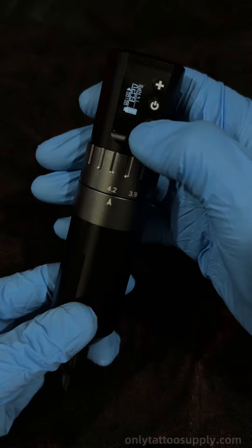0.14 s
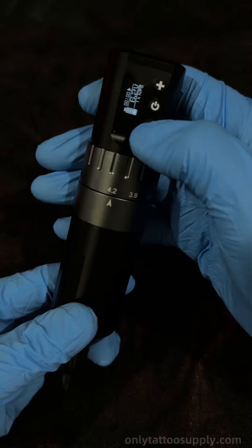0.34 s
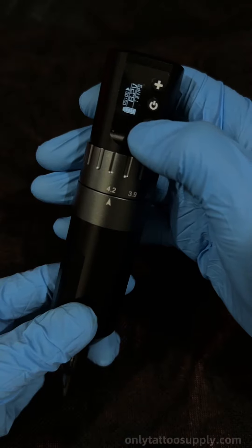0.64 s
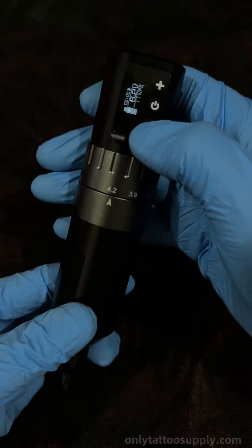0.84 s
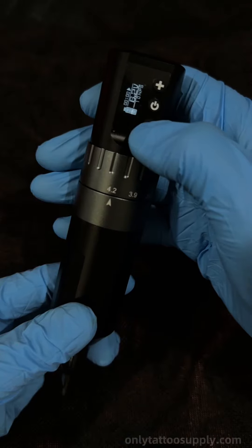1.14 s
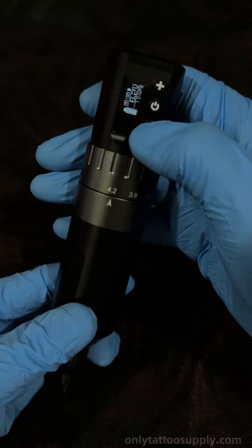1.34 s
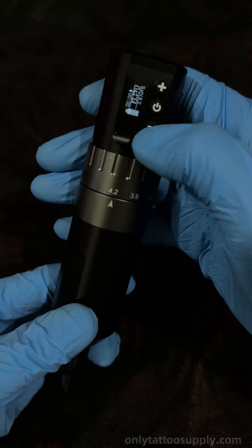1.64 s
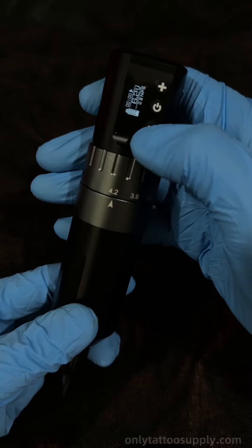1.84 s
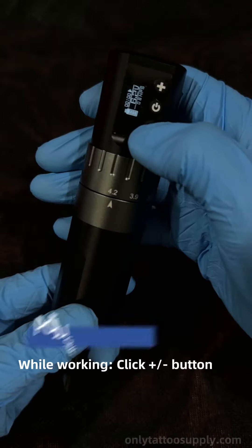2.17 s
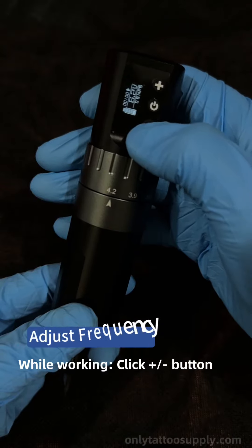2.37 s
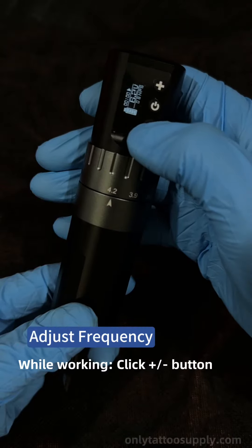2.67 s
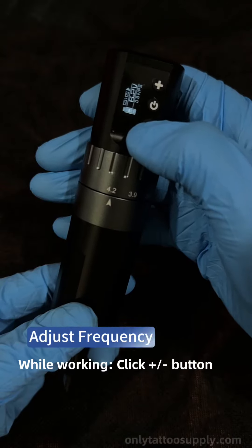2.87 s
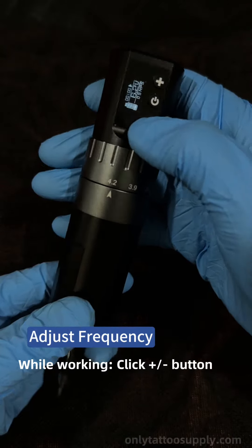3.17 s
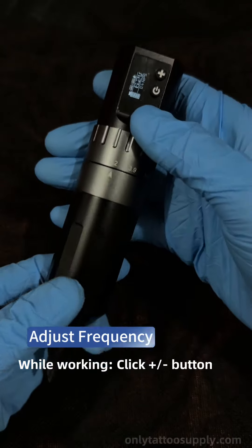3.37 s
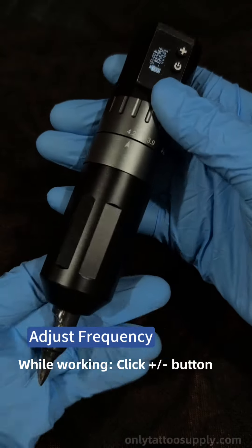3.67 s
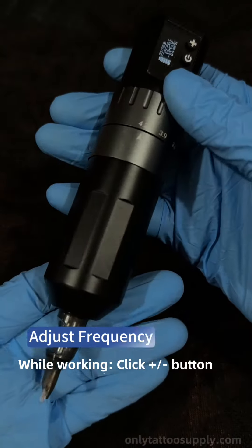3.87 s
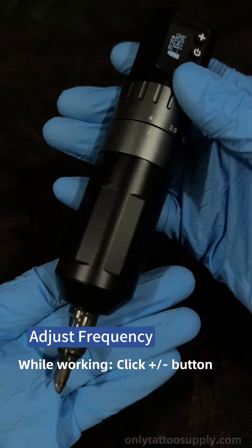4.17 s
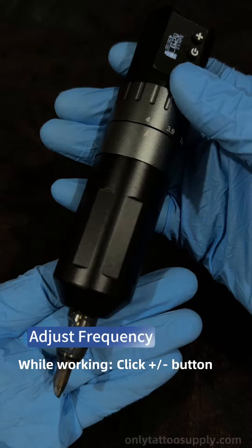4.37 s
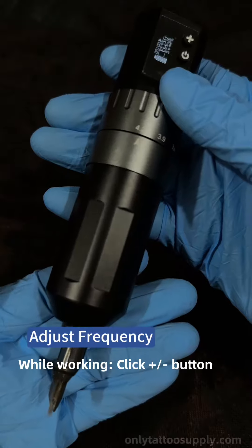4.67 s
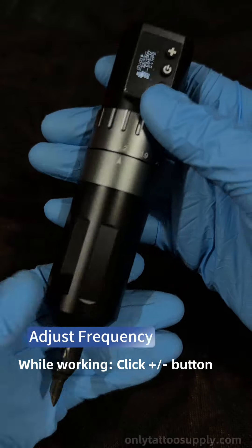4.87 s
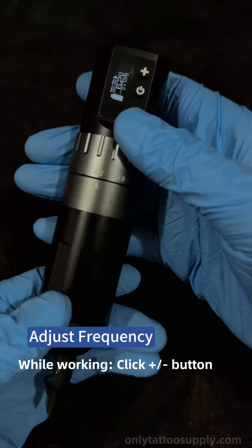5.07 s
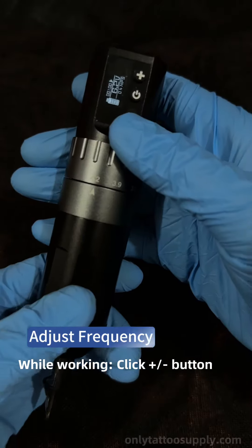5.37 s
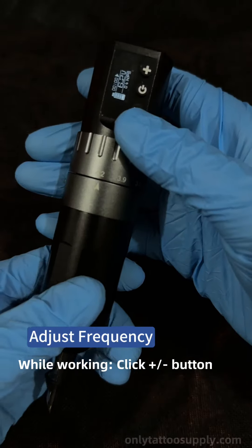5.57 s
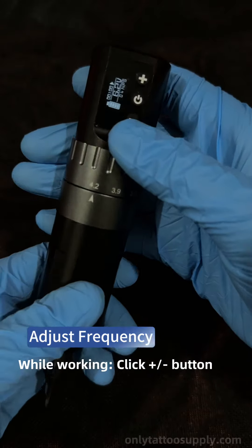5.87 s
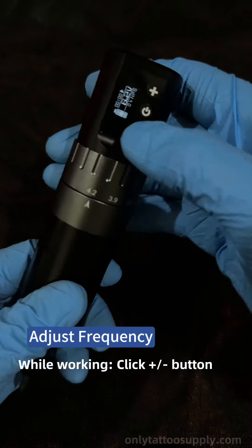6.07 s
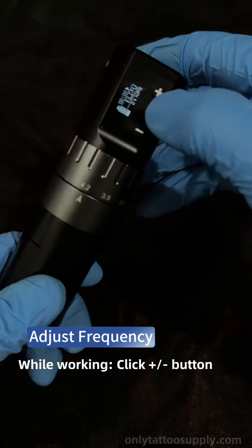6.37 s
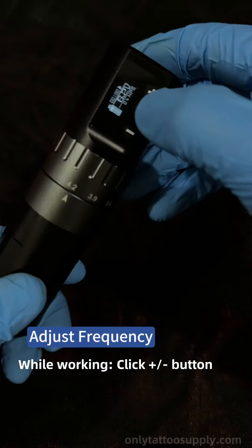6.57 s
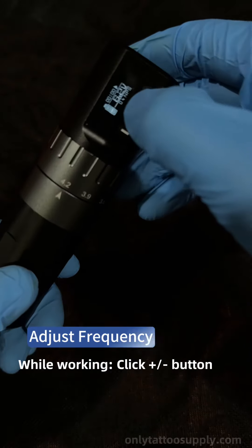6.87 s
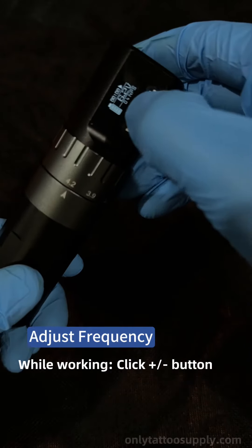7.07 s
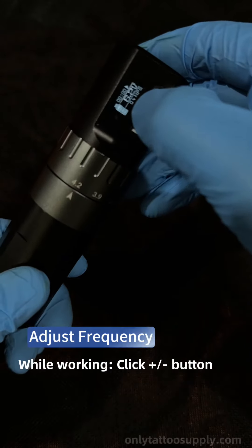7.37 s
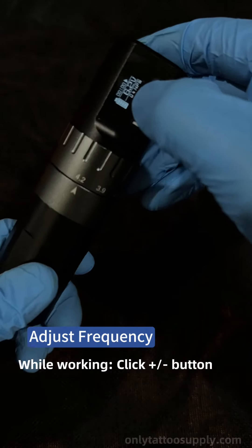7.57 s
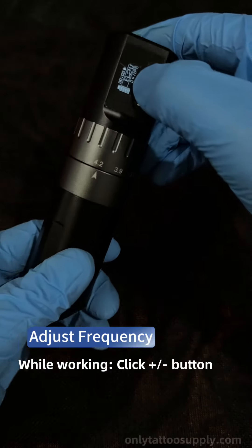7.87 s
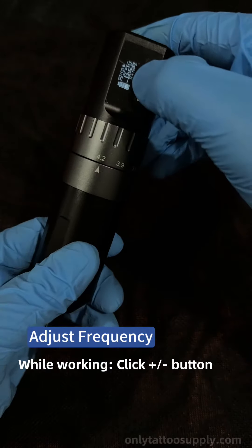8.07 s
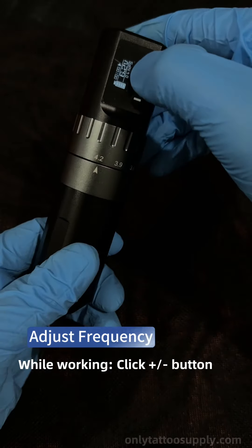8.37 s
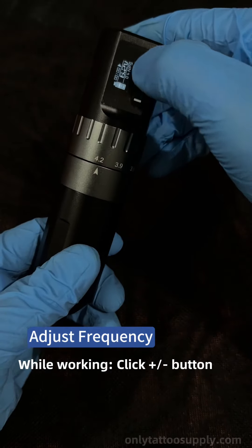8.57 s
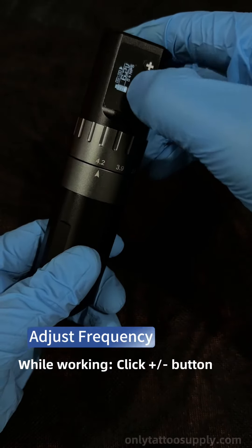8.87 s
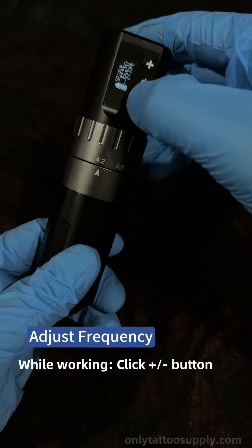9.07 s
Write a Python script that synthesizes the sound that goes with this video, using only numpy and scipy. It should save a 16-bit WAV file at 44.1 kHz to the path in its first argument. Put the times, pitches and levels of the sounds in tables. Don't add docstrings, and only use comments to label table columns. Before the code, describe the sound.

Steady on-off pulses of a tiny motor, bright and rattling, each starting abruptly and ending in a few slowing knocks with a faint ring. Snappy button clicks come first, then stop at about three seconds. After that thin rubber gloves rub, tick and bump as the tool is turned in the hand, while the pulses carry on regularly. Close phone microphone, small quiet room, faint distant drone and low hum beneath.

```python
import sys
import numpy as np
from scipy import signal
from scipy.fft import rfft, irfft, next_fast_len
from scipy.io import wavfile
from scipy.ndimage import map_coordinates

SR = 44100
rng = np.random.default_rng(int(sys.argv[2]) if len(sys.argv) > 2 else 0)


def transcribe(u):
    v = np.clip(np.atleast_2d(u).T, -1, 1)
    q = np.round(v * 32767).astype(np.int16)
    wavfile.write(sys.argv[1], SR, q)


def volts(x):
    e = np.asarray(x, float) / 20
    return 10 ** e


N = 407033


def unit(x):
    return x / np.sqrt(np.mean(x ** 2) + 1e-20)


def along(points, hz):
    f, v = np.transpose(points)
    return np.interp(np.log(hz + 1), np.log(f + 1), v)


def share_along(points, hz):
    return np.clip(along(points, hz), 0, 1)


def curve(rows):
    return np.interp(np.arange(N) / SR, *np.transpose(rows))


def wobble(rate):
    return map_coordinates(rng.standard_normal(int(N * rate / SR) + 4), [np.arange(N) * rate / SR])


def noise():
    return rng.standard_normal(N)


def filtered(x, response):
    m = next_fast_len(N + SR // 2)
    return irfft(rfft(x, m) * response(np.fft.rfftfreq(m, 1 / SR)), m)[..., :N]


def modes(table):
    def response(f):
        return sum((-1) ** k * volts(db) * 1j * f * w / (c * c - f * f + 1j * f * w)
                   for k, (c, w, db) in enumerate(table))
    return response


SHAFT_HZ = 78.68
# power on [t/s], level at start [level/dB], level at end [level/dB]
BURSTS = [(-.1385, -38.5, -42.5), (.479, -41, -43), (1.095, -41, -41.5), (1.723, -41.5, -43),
          (2.363, -41.5, -42), (3.04, -42.5, -39), (3.729, -39, -39.5), (4.417, -39, -38.5),
          (5.107, -40.5, -41), (5.793, -42, -42.5), (6.482, -39, -38.5), (7.172, -39, -39),
          (7.859, -41.5, -42), (8.548, -41.5, -43)]
RUNS = [.27, .248, .237, .263, .257, .267, .265, .265, .265, .265, .265, .265, .266, .265]
# small shift of its whole course, later or (below zero) earlier [t/ms]
SHIFT_MS = [-.4, .4, .4, .8, 1.1, 1, .2, .8, -.4, 2.2, 1.9, .4, 2.3, 1.5]
# time after power on [t/s], share of full speed [0-1], level [level/dB]
SPIN = [
    (0, .62, -25),
    (.0155, .85, -17),
    (.0166, .88, -4),
    (.032, 1, 0),
]
# time from last firm knock [t/s], share of full speed [0-1], level [level/dB]
COAST = [(-.04, 1, 0), (-.028, .82, -1), (-.02, .7, -2), (0, .62, -5), (.004, .5, -19), (.03, .33, -21),
         (.06, .2, -33), (.08, .1, -60)]


def shaft():
    turns, speed, level = np.zeros(N), np.zeros(N), np.full(N, -200.)
    main_knock_s = .0485
    t = np.arange(round(.4 * SR)) / SR
    for (on, start_db, end_db), run, lag in zip(BURSTS, RUNS, SHIFT_MS):
        at, share, db = np.transpose(SPIN + [(run + s, *rest) for s, *rest in COAST])
        pace = np.interp(t, at, np.clip(share, 0, 1))
        angle = np.cumsum(pace) * SHAFT_HZ / SR
        burst_db = np.interp(t, at, db, right=-200) + np.interp(t, [0, run], [start_db, end_db])
        now = np.arange(len(t)) + round((on + lag / 1000) * SR)
        heard = now >= 0
        turns[now[heard]] = (angle - np.interp(main_knock_s, t, angle))[heard]
        speed[now[heard]] = pace[heard]
        level[now[heard]] = burst_db[heard]
    return turns, speed, volts(level)


def level_to_buzz(x, buzz):
    return x / np.sqrt(np.mean((x * buzz) ** 2) / np.mean(buzz ** 2))


# [f/Hz], share alike [0-1]
REPEAT = [(3000, .05), (3600, .15), (4800, .25), (6000, .1), (9000, .04)]


def scrape(turns, running):
    track = rng.standard_normal(round(SR / SHAFT_HZ))
    same = map_coordinates(track, [turns % 1 * len(track)], mode="grid-wrap") * running
    repeated = filtered(same, lambda hz: np.sqrt(share_along(REPEAT, hz)))
    return repeated + filtered(noise(), lambda hz: np.sqrt(1 - share_along(REPEAT, hz)))


# place [share of a turn], level [level/dB], fade [turns]
KNOCKS = [
    (0, 0, .26),
    (.13, -2.5, .18),
    (.26, -2, .18),
    (.54, -1, .17),
]


def knocks(turns, speed, scatter_db, late):
    power = .025 * speed ** 2 + .04 * (turns < -2.5)
    burst = np.searchsorted([row[0] for row in BURSTS], np.arange(N) / SR) - 1
    for share, db, fade in KNOCKS:
        luck = rng.uniform(-1.7, 1.7, (64 * len(BURSTS), 2))
        row = 64 * burst + np.floor(turns - share + 0.09).astype(int) % 64
        since = (turns - share + 0.11) % 1 - .1 - late * luck[row, 0]
        bounce_db = -25 * (1 - speed) * (0 < share < .5)
        peak_db = db + bounce_db + scatter_db * luck[row, 1]
        power = power + (since > 0) * volts(2 * peak_db - 20 * np.abs(since) / fade)
    return np.sqrt(power)


# [t/s], [level/dB]
ACCENTS = [(3.7645, -0.5), (3.779, 3), (3.79, 1), (3.816, 4.5), (3.854, -2), (3.895, -1), (3.931, 3),
           (4.441, 0.5), (5.18, 2), (5.231, 2), (6.506, 0.5), (8.573, -4.5)]


def accents():
    db, t = np.zeros(N), np.arange(round(SR / SHAFT_HZ)) / SR
    for s, lift_db in ACCENTS:
        db[round(s * SR):][:len(t)] = lift_db * np.exp(-t / .012)
    return volts(db)


# from last firm knock [t/s], against the buzz [level/dB], rise [t/s]
ROLLS = [
    [(-.031, 1.5, 0.0025), (-.0185, 0, .0026), (-.0085, -1, 0.0028), (.009, -11, 0.0012),
     (.022, -12, .0014)],
    [(-.024, 2, 0.0022), (-.0135, -1.5, 0.0024), (-.0035, 0, .0017), (.0125, -18, 0.0013),
     (.027, -14, .0014), (.05, -22, 0.0013)],
]


def coasting():
    power, off, t = np.zeros(N + SR), np.zeros(N + SR, bool), np.arange(SR // 50) / SR
    for (on, _, end_db), run in zip(BURSTS, RUNS):
        rows = ROLLS[int(on > 3)]
        off[round((on + run + rows[0][0]) * SR):][:SR // 5] = True
        for s, db, rise in rows:
            at = round((on + run + s - rise / 3 + rng.normal(0, .0007)) * SR)
            gain = volts(end_db + db + rng.normal(0, 1.5))
            power[at:][:len(t)] += (gain * t / rise * np.exp(1 - t / rise)) ** 2
    return power[:N], off[:N]


def cam(turns, speed, buzz):
    gate = level_to_buzz(knocks(turns, speed, scatter_db=1.0, late=.012), buzz) * accents()
    last, off = coasting()
    gate = np.where(off, 1, gate)
    drag = volts(-12 - 6 * (speed < .55)) * buzz
    shake = np.where(off, np.sqrt(last + drag ** 2), buzz)
    touch = 4.5 * np.clip(np.diff(gate, prepend=0), 0, None) * (turns > -2.5) * ~off
    rattle = gate * volts(.6 * wobble(1500)) * scrape(turns, buzz > 1e-6)
    return gate, shake, level_to_buzz(rattle + touch, buzz), off


def whirr(turns, buzz, off):
    def swell(db, turn, times=1):
        return db * np.cos(2 * times * np.pi * (turns - turn))
    poles = 3 * np.cos(2 * np.pi * (6 * turns - .05))
    hiss = volts(poles + .6 * wobble(250)) * scrape(turns, buzz > 1e-6)
    once = level_to_buzz(volts(swell(5, .2) + swell(1.5, .12, 2)) * hiss, buzz)
    twice = level_to_buzz(volts(swell(2.2, .12) + swell(5, .19, 2)) * hiss, buzz)
    return np.where(off, level_to_buzz(hiss, buzz), [once, twice])


# [f/Hz], share [0-1]
KNOCK_SHARE = [(1500, .22), (3000, .32), (4000, .42), (6000, .55), (7500, .97), (10500, .97), (11500, .35),
               (15000, .3)]
# [f/Hz], share [0-1]
RETURN_SHARE = [(2600, 1), (3400, 0), (10000, 0), (11000, 1)]
# [f/Hz], density [level/dB per Hz]
UPRIGHT = [(820, -47), (1400, -17), (1860, -2), (2330, -1), (2580, 1), (3130, -7.5), (3500, -5),
           (4300, -12), (4660, -6), (6590, -9.5), (7840, -2), (9710, -2.5), (11100, -13.5), (15100, -10),
           (16000, -13)]
LIFTED = [(820, -44), (1400, -24), (1600, -12), (1730, -16), (3540, -19), (3840, -26), (4340, -14.5),
          (5600, -24), (6260, -11), (6870, -18), (9320, -3), (9810, -11.5), (11400, -28.5), (12900, -14),
          (16000, -30)]
LOWERED = [(820, -55), (1400, -24), (1600, -13.5), (2130, -5), (3040, -14), (3500, -9.5), (4660, -11),
           (5320, -15.5), (6390, -1), (7150, -10.5), (8860, -5), (9420, -4.5), (10900, -17), (12900, -15),
           (16000, -19)]
CUPPED = [(820, -48), (1400, -22), (1600, -12), (2130, 0.5), (3070, -7), (3610, -4.5), (4120, -16),
          (4470, -8), (7220, -8), (8680, -3), (9710, -11), (11200, -13), (12000, -15), (13200, -7.5),
          (16000, -14.5)]
TILTED = [(820, -56), (1400, -23.5), (2130, -1.5), (3010, -14), (3760, -11.5), (4210, -23), (4660, -10.5),
          (5830, -5), (7080, -18.5), (7680, -5.5), (9320, -0.5), (11000, -21), (12800, -14.5), (15500, -19),
          (16000, -33)]
TURNED = [(820, -41), (1400, -23), (1600, -13.5), (2170, 0.5), (2630, -7), (4210, -4.5), (4610, -9.5),
          (5830, -8), (6870, -5.5), (7450, -11), (9420, -3.5), (11000, -21.5), (12900, -9), (15100, -14),
          (16000, -28)]
GRIPS = [UPRIGHT, LIFTED, LOWERED, CUPPED, TILTED, TURNED]
# [f/Hz], width [f/Hz], [level/dB]
DENTS = [
    [(2500, 240, -5), (5230, 300, -1.5), (6700, 250, -2.5), (12450, 200, -2), (13000, 250, 1.5),
     (13800, 400, -2.5), (14500, 250, 2)],
    [(2500, 280, -0.5), (4040, 150, 2), (6120, 140, -6), (7320, 250, 2), (11100, 260, 4), (11630, 150, -13),
     (14500, 250, -4), (15500, 300, 2.5)],
    [(4100, 170, -10), (6100, 140, -14), (9800, 150, -4), (13000, 250, 3)],
    [(5900, 150, 4.5), (7350, 150, -3), (8700, 200, 3), (12450, 200, -3), (13000, 250, 4)],
    [(5350, 140, -8), (9850, 170, -6), (10800, 130, -10), (11150, 200, 5), (14400, 300, -3)],
    [(4160, 150, -11.5), (5800, 200, -7), (7400, 180, -5), (8000, 150, 5), (9400, 120, 7)],
]
# [f/Hz], width [f/Hz], [level/dB]
SHELL = [(986, 50, 14), (3510, 730, 3.5), (4560, 260, 3.5), (7000, 135, 2), (7900, 140, 2.5),
         (8740, 290, 1.5), (10260, 300, 4), (12660, 250, 6.5), (14750, 340, 6)]


def housing(shake, knock, whirrs, grip):
    def whirr_split(hz):
        back = share_along(RETURN_SHARE, hz)
        return np.sqrt(1 - share_along(KNOCK_SHARE, hz)) * [1 - back, back]

    def colours(hz):
        spectra = []
        for spectrum, dents in zip(GRIPS, DENTS):
            bumps = sum(db * np.exp(-((hz - c) / w) ** 2) for c, w, db in SHELL + dents)
            spectra.append(unit(volts(along(spectrum, hz) + bumps)))
        return np.array(spectra)

    drive = filtered(shake * knock, lambda hz: np.sqrt(share_along(KNOCK_SHARE, hz)))
    drive += filtered(shake * whirrs, whirr_split).sum(axis=0)
    return sum(np.clip(1 - np.abs(grip - k), 0, 1) * x for k, x in enumerate(filtered(drive, colours)))


def motor_lines(turns, orders):
    k, db = np.arange(len(orders)) + 2, np.array(orders)
    cycle = np.arange(4096)[:, None] / 4096
    phase = 1.26 * rng.standard_normal(len(k)) + 0.5 * rng.standard_normal((2, 1, len(k)))
    one, other = (volts(db) * np.sin(2 * np.pi * k * (cycle - .17) + phase)).sum(axis=2)
    mix, at = .5 + .5 * np.tanh(wobble(15)), (turns % 1 * 4095).astype(int)
    return (mix * one[at] + (1 - mix) * other[at]) / one.std()


# [f/Hz], width [f/Hz], [level/dB]
RINGS = [
    (2194, 2.8, 36),
    (2205, 5, 25),
    (9540, 420, 5.5),
    (9480, 18, 9),
]
RING_DB = [0, 0, -2, -3, 0, 4, -2, -2, 1, 0, -2, -1, -3, 0]


def low_rings(low):
    strike = volts(-11) * noise()
    stops = np.array([on + run for (on, *_), run in zip(BURSTS, RUNS)])
    stop_gain = volts(35 + np.array(RING_DB))
    strike[np.round(stops * SR).astype(int)] = stop_gain
    strike[np.round((stops + .032) * SR).astype(int)] = volts(19) * stop_gain * (stops > 3)
    struck = [RINGS[0], RINGS[1], RINGS[3]]
    return filtered(low * strike, lambda hz: sum(modes([ring])(hz) for ring in struck))


# time after power on [t/s], against the buzz [level/dB]
GROAN = [(-.001, -60), (0, -27), (.005, -17), (.014, -15), (.02, -19), (.03, -40)]
# [f/Hz], density [level/dB per Hz]
GROAN_COLOUR = [(600, -32), (1000, 6.5), (1400, -10.5), (2200, -1), (4500, -3), (6500, -6), (8000, -22),
                (16000, -30)]


def start_up():
    level = curve([(on + s, start_db + db) for on, start_db, _ in BURSTS for s, db in GROAN])
    out = volts(level) * unit(filtered(noise(), lambda hz: volts(along(GROAN_COLOUR, hz))))
    t = np.arange(SR // 200) / SR
    for on, start_db, _ in BURSTS[1:]:
        bright = np.diff(rng.standard_normal(len(t) + 2), 2) / 2.5
        out[round(on * SR):][:len(t)] += volts(start_db - 14.5 - 60 * t / .006) * bright
    return out


# [t/s], grip number
HOLD = [(3.1, 0), (3.45, 1), (4.8, 1), (5, 2), (5.5, 2), (5.7, 3), (6.2, 3), (6.4, 4), (7.5, 4), (7.8, 5)]
# shaft hum, motor lines, low ring, high ring [level/dB]
CARRY = [
    (-14.5, -7, -25.5, -7.5),
    (-24.5, -12, -33.5, 2.5),
    (-21, -8.5, -29.5, 0.5),
    (-20.5, -9.5, -21.5, -5),
    (-27, -12.5, -27, 0.5),
    (-21, -9.5, -21, -3),
]
LOW_ORDERS = [-7, -8.5, -23, -23.5, -20, -11.5, -17.5, -16, -36.5, -39, -9.5, -6.5, -17.5, -17.5, -17,
              -18.5, -34, -25.5]
HIGH_ORDERS = [
    (-5.0, -3.0, -20.0, -5.0, 5.0, -4.0, 4.0, -4.0, -2.0, -18.0, -2.0, -21.0, 2.0, -1.0, -1.0, -2.0, -10.0, -0.0, -9.0, -10.0, -9.0, -5.0, -6.0, -4.0, -1.0, -7.0, -17.0, -8.0, -7.0, -6.0, -12.0, -14.0, -6.0, -14.0, -16.0, -14.0, -10.0, -3.0, -19.0, -3.0, -9.0, -4.0),
    (-8.0, -5.0, -9.0, -9.0, -0.0, -2.0, -7.0, -0.0, -2.0, -4.0, -4.0, -6.0, -2.0, -5.0, -8.0, -8.0, -18.0, -7.0, -24.0, -22.0, -12.0, -11.0, -17.0, -5.0, -8.0, -15.0, -9.0, -20.0, -20.0, -10.0, -22.0, -14.0, -27.0, -19.0, -18.0, -15.0, -21.0, -7.0, -20.0, -5.0, -21.0, -6.0),
]


def pen():
    turns, speed, buzz = shaft()
    gate, shake, knock, off = cam(turns, speed, buzz)
    grip = curve(HOLD)
    body = housing(shake, knock, whirr(turns, buzz, off), grip)
    hum_gain, lines, low, high = (buzz * volts(np.interp(grip, np.arange(len(CARRY)), db))
                                  for db in np.transpose(CARRY))
    shaft_hum = np.sqrt(2) * hum_gain * np.sin(2 * np.pi * turns)
    upright, tilted = (motor_lines(turns, [*LOW_ORDERS, *orders]) for orders in HIGH_ORDERS)
    tilt = np.clip(grip / 3, 0, 1)
    motor = lines * speed ** 2 * ((1 - tilt) * upright + tilt * tilted)
    hits = high * shake / (buzz + 1e-9) * level_to_buzz(knock * np.sqrt(gate), buzz)
    high_ring = filtered(hits, lambda hz: modes(RINGS[2:3])(hz) ** 2)
    return body + motor + shaft_hum + low_rings(low) + high_ring + start_up()


# [t/s], [f/Hz], [level/dB]
HUM_RISING = [(0.0, 45.36, -59.9), (1.3, 45.54, -71.0), (2.6, 45.57, -66.4), (3.9, 42.76, -71.0),
              (5.2, 44.58, -52.9), (6.5, 45.54, -55.9), (7.8, 46.75, -61.5), (9.23, 47.53, -63.4)]
HUM_SAGGING = [(0.0, 44.27, -59.2), (1.3, 44.77, -67.1), (2.6, 43.84, -53.9), (3.9, 43.58, -65.7),
               (5.2, 43.53, -54.9), (6.5, 43.19, -64.2), (7.8, 43.17, -71.0), (9.23, 42.78, -69.8)]


def hum():
    out = np.zeros(N)
    for rows, start_turns in [(HUM_RISING, .55), (HUM_SAGGING, 0)]:
        s, hz, db = np.transpose(rows)
        turns = start_turns + np.cumsum(curve(np.c_[s, hz])) / SR
        out += volts(curve(np.c_[s, db]) + .8 * wobble(4)) * np.sqrt(2) * np.sin(2 * np.pi * turns)
    return volts(.3) * out


# [f/Hz], density [level/dB per Hz]
AIR = [(25, -25), (35, -13.5), (60, 0), (76, -8), (118, -15), (189, -13.5), (323, -17), (371, -14),
       (448, -21), (515, -22), (1110, -19), (1950, -27), (3420, -36), (5590, -39), (14200, -67),
       (16000, -66)]
# [t/s], [level/dB]
DRONE = [(0.0, -71), (0.23, -71), (2.39, -70), (3.96, -62), (4.34, -69.5), (8.51, -60.5), (9.23, -65)]
# [f/Hz], width [f/Hz], [level/dB]
DRONE_MODES = [(164.5, 81, -2), (238.4, 23, 2.5), (372, 142, -3.5)]


def background():
    air = volts(-62 + .7 * wobble(2.82)) * unit(filtered(noise(), lambda hz: volts(along(AIR, hz))))
    drone_db = curve(DRONE) - 2.5 + 0.51 * wobble(2.88)
    drone = volts(drone_db) * unit(filtered(noise(), modes(DRONE_MODES)))
    hiss = volts(-88.5) * noise()
    return hiss + air + drone + hum()


# [t/s], peak [level/dB]
PRESSES = [(0.2875, -33), (.521, -35), (0.7673, -33), (1.0056, -33), (1.306, -35.5), (1.8727, -39),
           (1.994, -42), (2.1283, -32.5), (2.378, -31.5), (2.618, -33.5), (2.866, -32.5)]
# [t/s], peak [level/dB]
RELEASES = [(.167, -39.5), (0.428, -39), (0.908, -38.5), (1.3297, -43), (2.27, -38), (2.756, -37.5),
            (2.988, -38)]
# [f/Hz], width [f/Hz], pressed [level/dB], released [level/dB]
CAP_MODES = [(1800, 850, 22.5, 10), (2560, 220, 11, 9), (3540, 600, 17, 11), (4200, 570, 13, 12),
             (5300, 700, 21, 21), (6350, 500, 13, 17), (7150, 500, 14, 11), (7950, 450, 12, 10),
             (9740, 450, 9, 11), (10550, 300, 10, 4), (11450, 450, 7, 2), (13130, 300, -5, 2),
             (14200, 800, 8, 11)]
# [f/Hz], width [f/Hz]
CAP_NOTCHES = [(2900, 350), (4680, 160), (5900, 200), (8700, 300), (11000, 250), (12200, 400)]


def button():
    out, t = np.zeros(N), np.arange(round(0.0064 * SR)) / SR
    hz, width, *levels = np.transpose(CAP_MODES)
    step_s, step_share = .00058, .45

    def buckling(f):
        gaps = np.prod([(c * c - f * f + .12j * f * w) / (c * c - f * f + 1j * f * w)
                        for c, w in CAP_NOTCHES], axis=0)
        top = volts(np.interp(f, [15900, 16500, 16800], [0, -8, -40]))
        step = np.exp(-2j * np.pi * f * step_s)
        steps = (step - step_share) / (1 - step_share * step)
        low_cut = (f * f / (1450 ** 2 - f * f + 1500j * f)) ** 2
        return gaps * top * steps * low_cut

    for events, level, sign in zip([PRESSES, RELEASES], levels, [1, -1]):
        def cap(f):
            return sum(modes([mode])(f) * mode[0] / (1j * f + 1) for mode in zip(hz, width, level))
        snaps = np.zeros(N)
        for s, db in events:
            snaps[round((s + .0013) * SR)] += sign * volts(db + 1)
            snaps[round((s + .0153) * SR)] += volts(db - 29)
            snaps[round((s + .0225) * SR)] += volts(db - 23)
            rattle = volts(db - 34 - 60 * t / .012) * rng.standard_normal(len(t))
            snaps[round((s + .001) * SR):][:len(t)] += rattle
        out += filtered(snaps, lambda f: buckling(f) * cap(f))
    return out


# loudest [t/s], [level/dB], rise [t/s], fall [t/s]
MOVES = [(2.84, -75, .15, .1), (3.44, -62, .03, .3), (3.49, -59, 0.25, 0.31), (3.61, -59, .1, 0.16),
         (4.15, -69.5, 0.64, 0.47), (4.39, -73, .15, 0.11), (4.87, -67.5, .15, 0.12),
         (5.02, -60, 0.14, 0.37), (5.466, -64, 0.32, 0.018), (5.54, -71, .3, 0.043),
         (5.78, -64.5, 0.32, .1), (6.2, -73.5, 0.17, 0.36), (6.38, -77, 0.15, 0.23), (7.65, -60, 0.038, .2),
         (7.72, -65, .1, 0.19), (9.12, -79.5, 0.078, 0.11)]


def sliding():
    t = np.arange(0, N / SR, .001)
    after_buzz = [(on + run, -67, .01, .2) for (on, *_), run in zip(BURSTS, RUNS)]
    after_click = [(s, db - 39, .002, .24) for s, db in PRESSES + RELEASES]
    power = sum(volts(2 * db - 43.0 * np.maximum((s - t) / rise, (t - s) / fall))
                for s, db, rise, fall in MOVES + after_buzz + after_click)
    return curve(np.c_[t, np.sqrt(power)])


# [f/Hz], density [level/dB per Hz]
GLOVE = [(880, -31.5), (1500, -4.5), (2060, -14), (4000, -7.5), (8160, -8), (11900, -13.5), (14100, -9),
         (16000, -14)]
# rows of ([t/s], [level/dB]), then [f/Hz], width [f/Hz]
RUB = [
    ([(5.45, -85), (5.5, -75), (5.555, -73), (5.6, -80), (5.655, -71), (5.69, -76), (5.75, -72), (5.8, -80), (5.81, -120)], 3400, 700),
    ([(4.95, -90), (5, -76), (5.04, -70), (5.07, -77), (5.1, -72), (5.12, -90), (5.13, -120)], 5500, 800),
]
# [t/s], peak [level/dB], [f/Hz]
TICKS = [(1.362, -45, 2830), (1.3843, -57, 3470), (3.488, -50, 3430), (3.4965, -41, 3500),
         (3.6115, -49, 5190), (3.6115, -52, 3900), (3.689, -53, 2660), (3.689, -55, 1900),
         (4.819, -50, 2730), (4.819, -62, 3400), (4.819, -60, 1900), (3.527, -52, 3600), (3.514, -55, 7400),
         (3.59, -54.5, 6300), (5.462, -54, 6800), (5.462, -53, 5900), (5.462, -60, 10100),
         (5.462, -55, 1300), (6.151, -63, 5200), (6.155, -63, 2700), (6.183, -53, 11200),
         (6.183, -55, 9200), (6.801, -53, 5700), (6.801, -56, 8200), (6.183, -52, 7400),
         (6.3605, -57, 5600), (6.364, -55, 3400), (7.49, -55, 5700), (7.49, -63, 8000)]
# [t/s], [level/dB], [f/Hz]
THUMP = [(3.2, -39, 1180), (3.2045, -41, 1500), (3.204, -45.5, 370), (3.215, -50.5, 970)]


def gloves():
    grain = volts(2.2 * wobble(40) + 0.92 * wobble(600)) * noise()
    out = sliding() * unit(filtered(grain, lambda hz: volts(along(GLOVE, hz))))
    for rows, hz, width in RUB:
        out += volts(curve([(0, -120), *rows])) * unit(filtered(grain, modes([(hz, width, 0)])))
    t = np.arange(SR // 20) / SR
    for s, db, hz in TICKS:
        tick = np.sin(2 * np.pi * hz * t) + .3 * rng.standard_normal(len(t))
        out[round(s * SR):][:len(t)] += volts(db + 3 - 60 * t / .0038) * tick
    for s, db, hz in THUMP:
        resonator = [1, -2 * .97 * np.cos(2 * np.pi * hz / SR), .97 ** 2]
        puff = unit(signal.lfilter([1], resonator, rng.standard_normal(len(t))))
        out[round(s * SR):][:len(t)] += volts(db - 60 * t / 0.064) * (1 - np.exp(-t / 0.0018)) * puff
    return out


# [f/Hz], time to fall 60 dB [t/s]
ROOM = [(500, 0.65), (2500, 0.37), (9000, 0.21), (15000, 0.23)]


def room(x):
    hz, t, z = signal.stft(rng.standard_normal(SR // 2), SR, nperseg=256)
    tail = signal.istft(z * volts(-60 * t / along(ROOM, hz)[:, None]), SR, nperseg=256)[1]
    return signal.fftconvolve(np.pad(x, (500, 0)), tail / np.linalg.norm(tail))[:N]


def scene():
    buzz, clicks = pen(), button()
    steady = buzz + volts(-17.5) * room(buzz + clicks) + gloves() + background()
    dulled = filtered(steady, lambda hz: volts(np.interp(hz, [15700, 16000, 16680, 16800],
                                                       [0, -33.5, -47.5, -46.5])))
    return (dulled + clicks)[None]


def roll_off(x):
    return signal.sosfilt(signal.butter(12, 16800, fs=SR, output="sos"), x)


def record(dry):
    return roll_off(dry)


dry = scene()
out = record(dry)
transcribe(out)
```